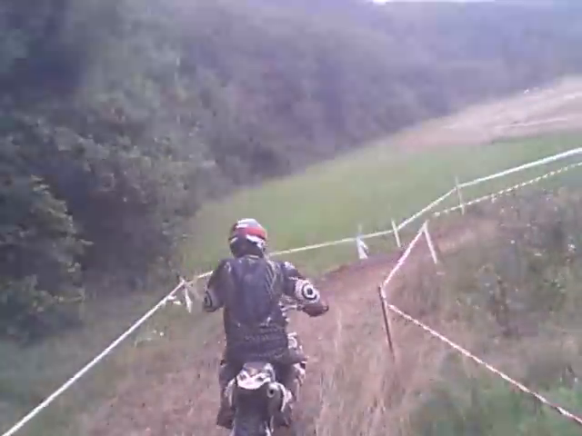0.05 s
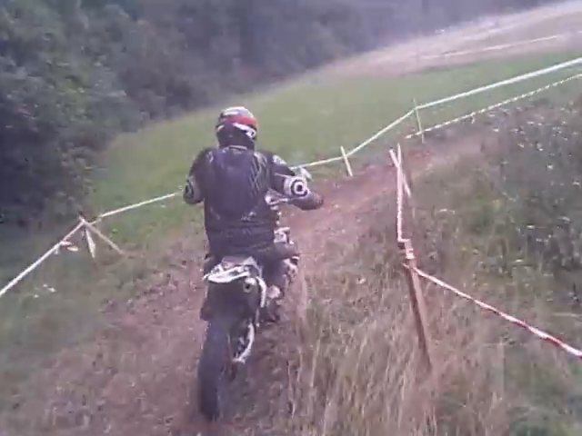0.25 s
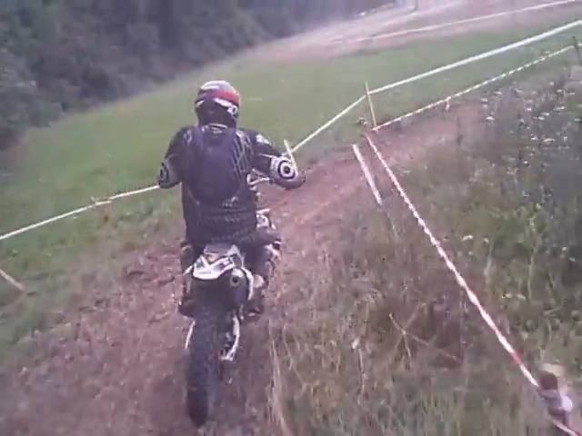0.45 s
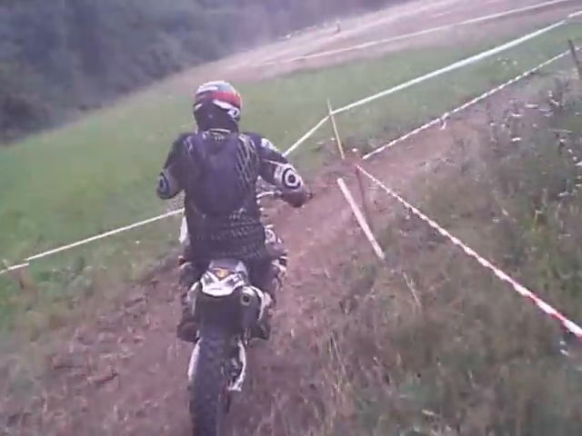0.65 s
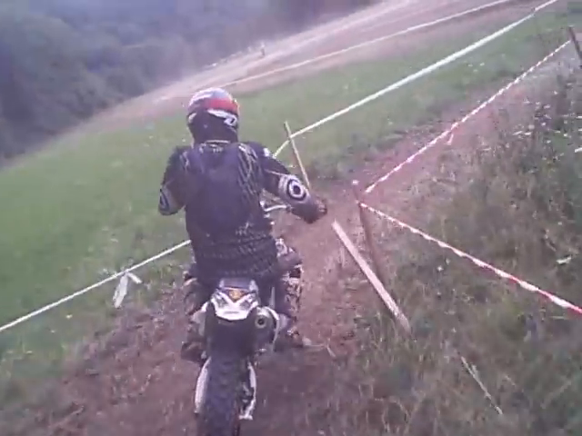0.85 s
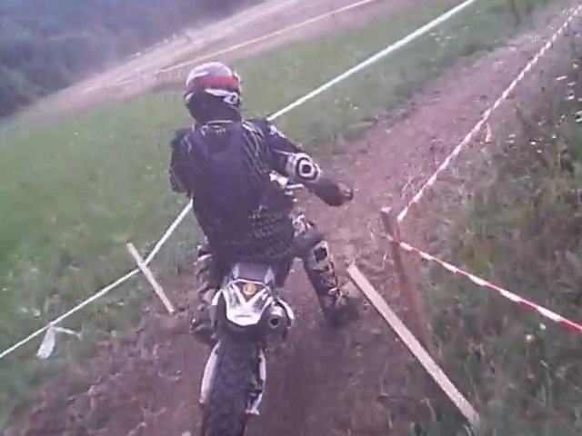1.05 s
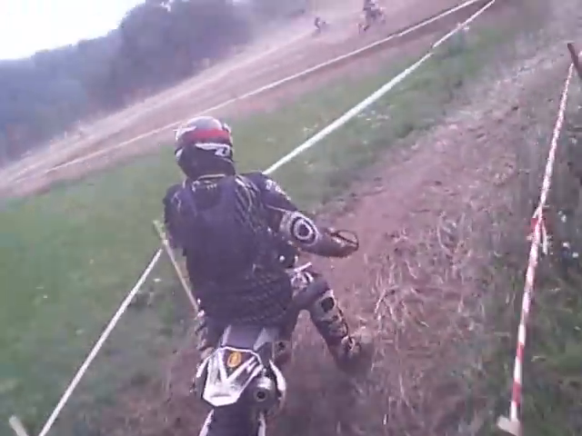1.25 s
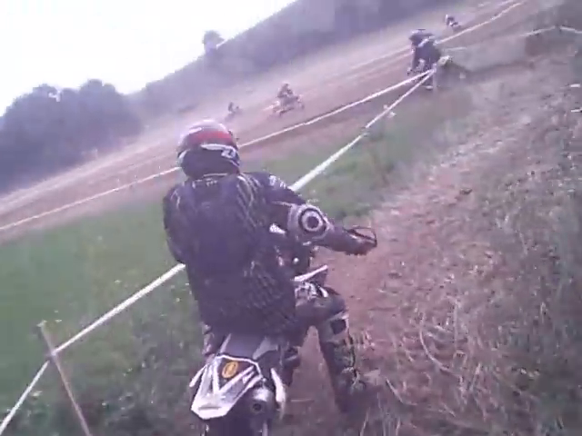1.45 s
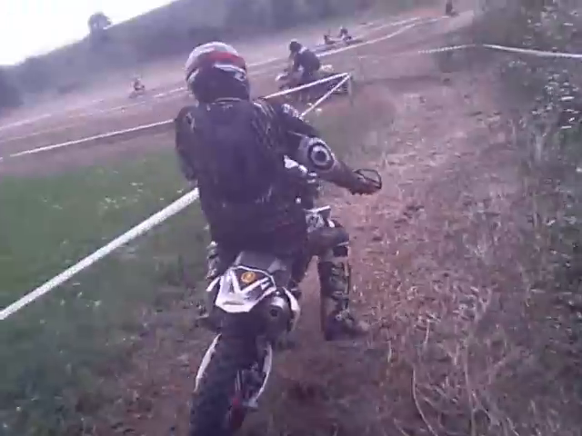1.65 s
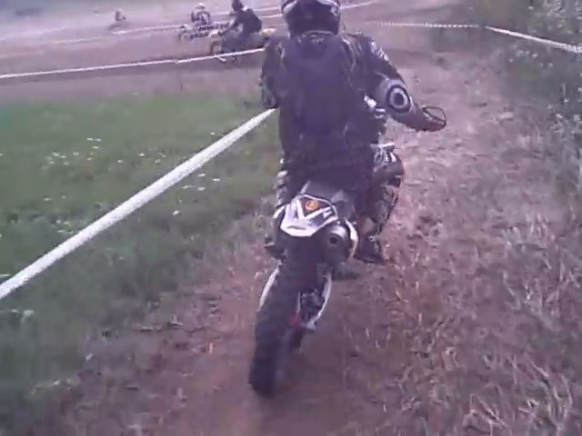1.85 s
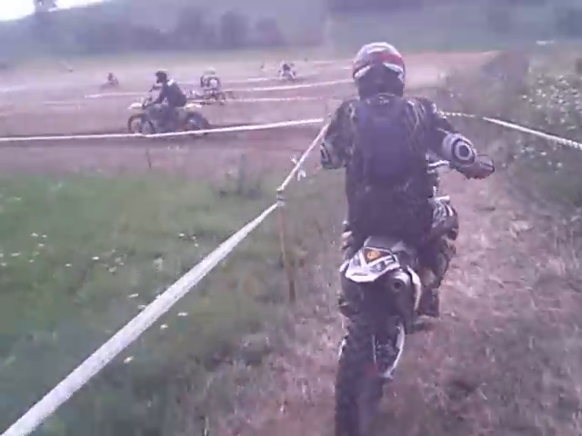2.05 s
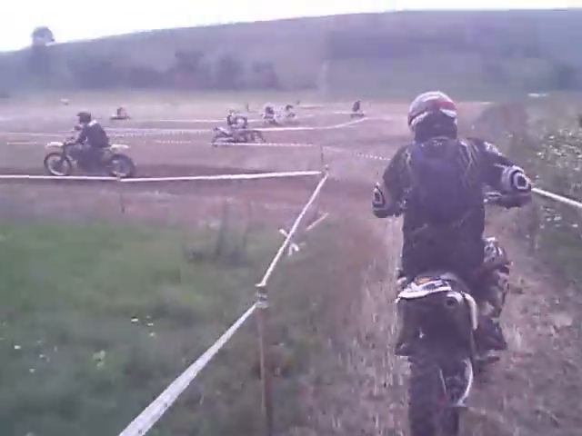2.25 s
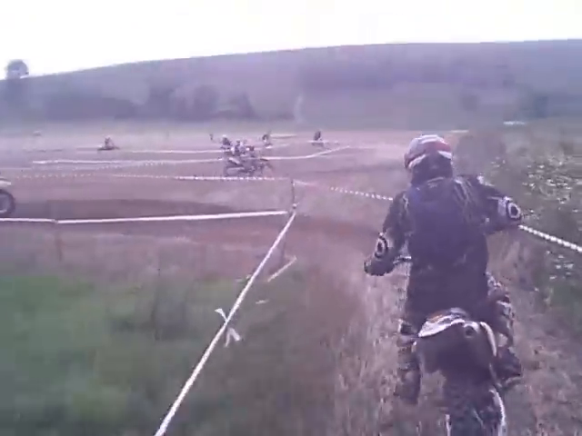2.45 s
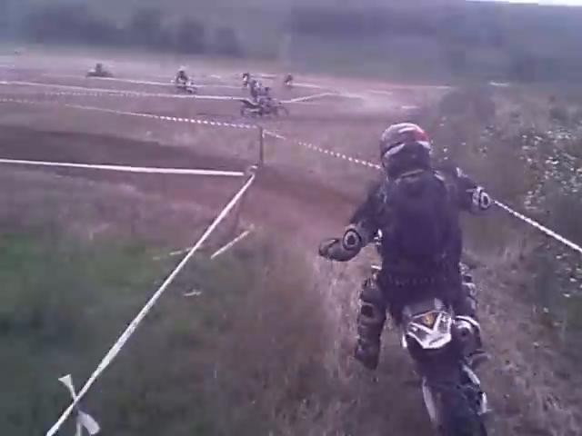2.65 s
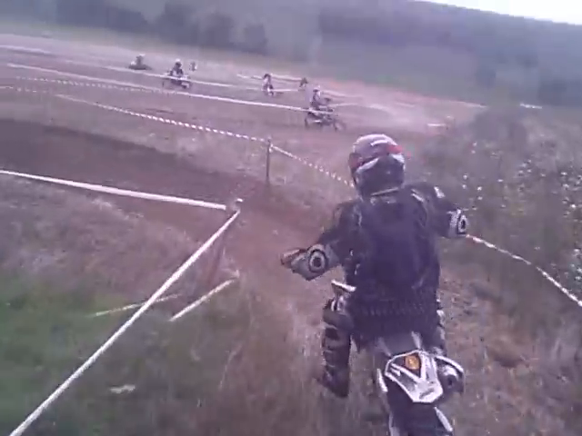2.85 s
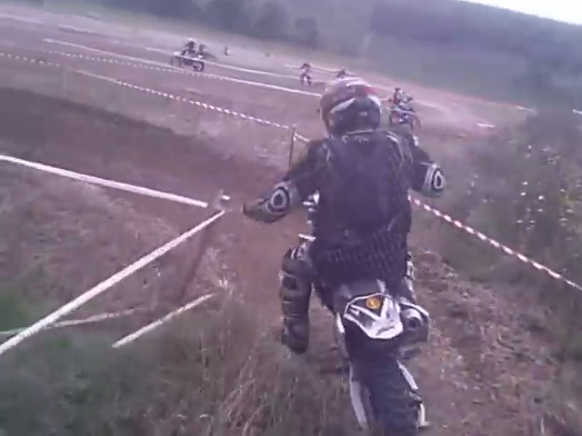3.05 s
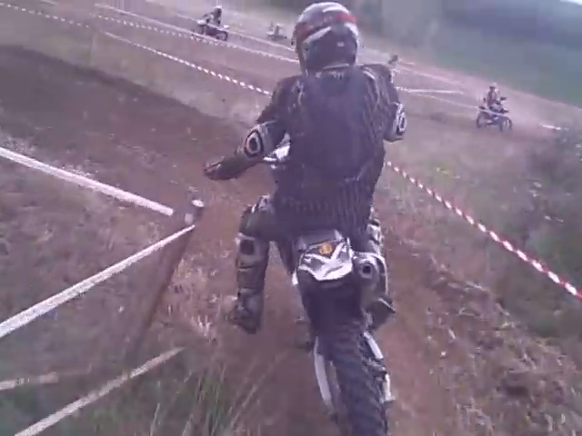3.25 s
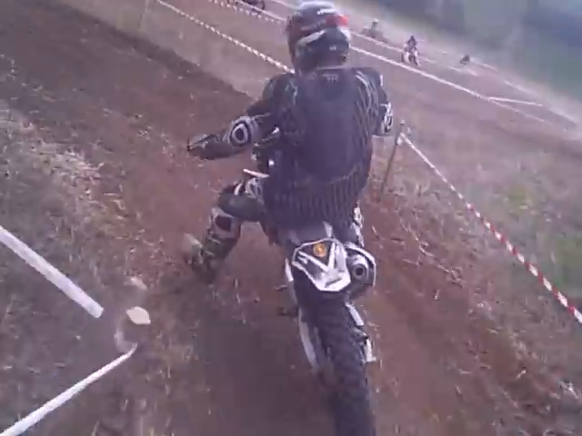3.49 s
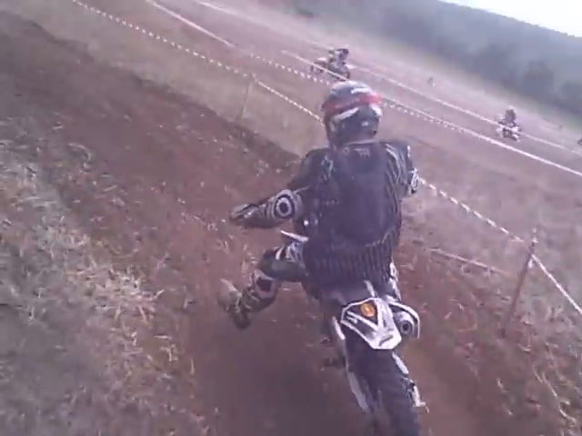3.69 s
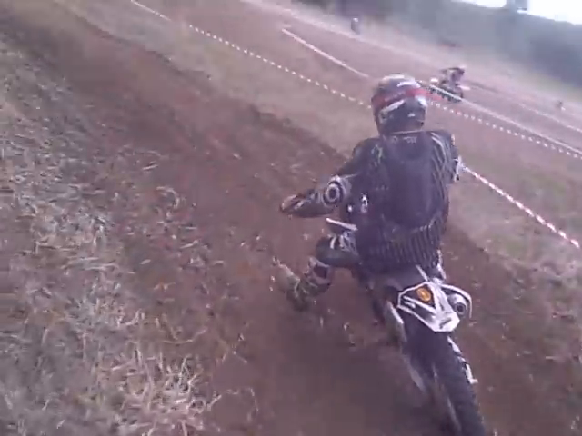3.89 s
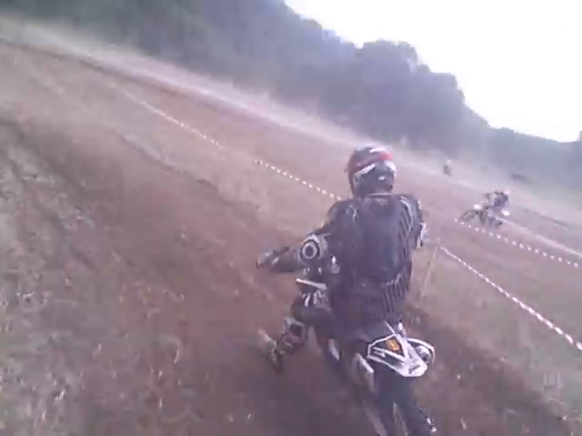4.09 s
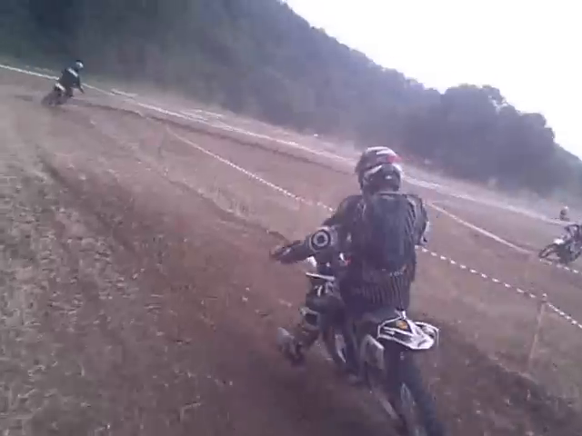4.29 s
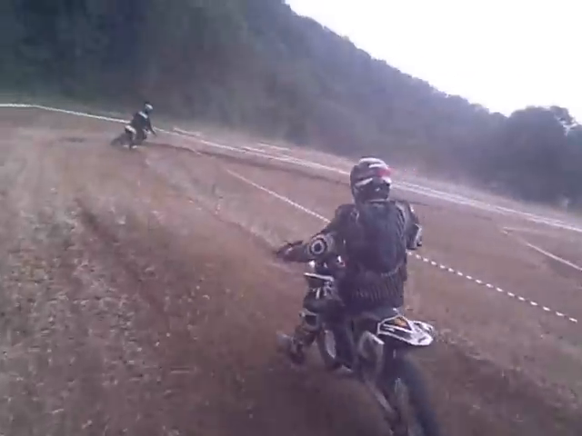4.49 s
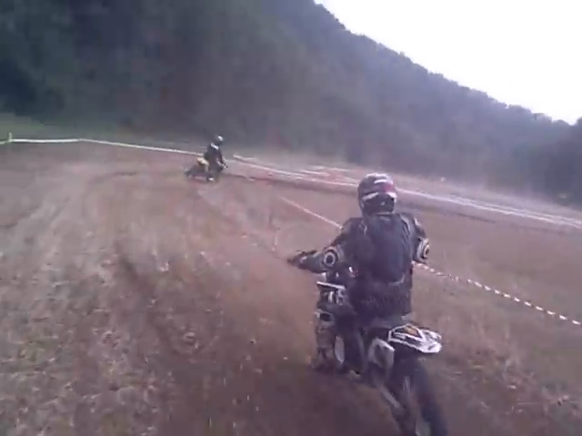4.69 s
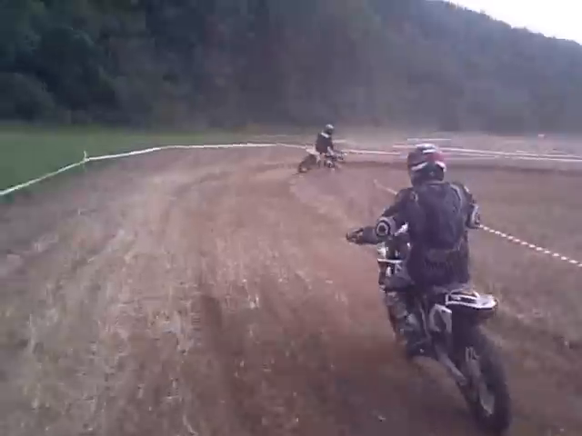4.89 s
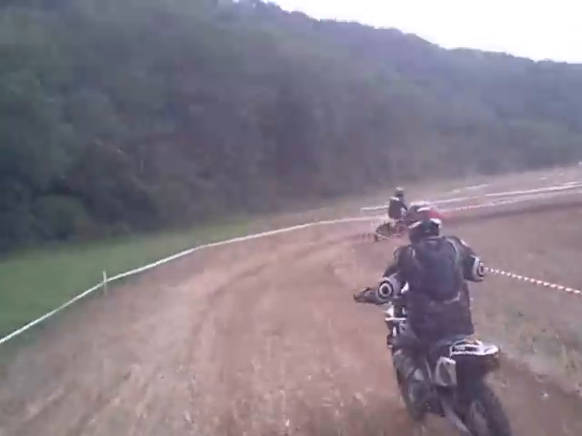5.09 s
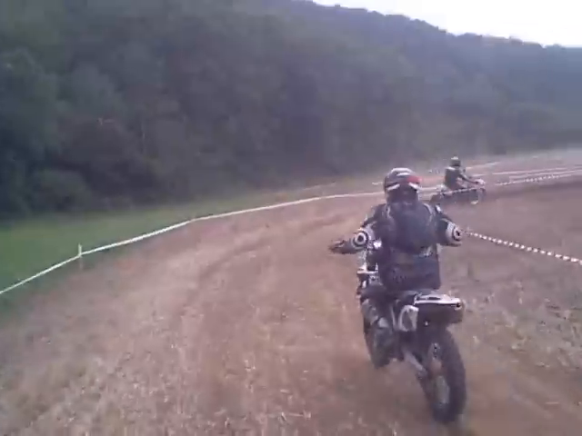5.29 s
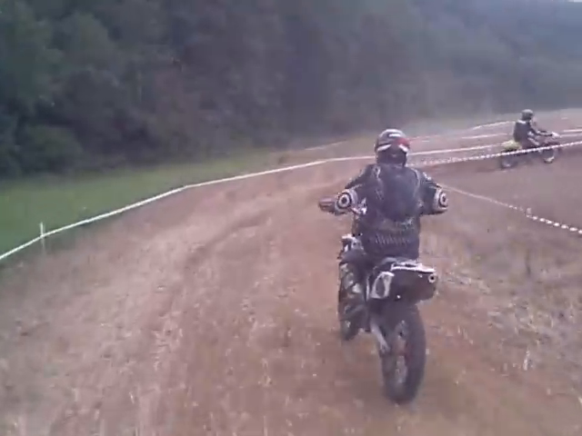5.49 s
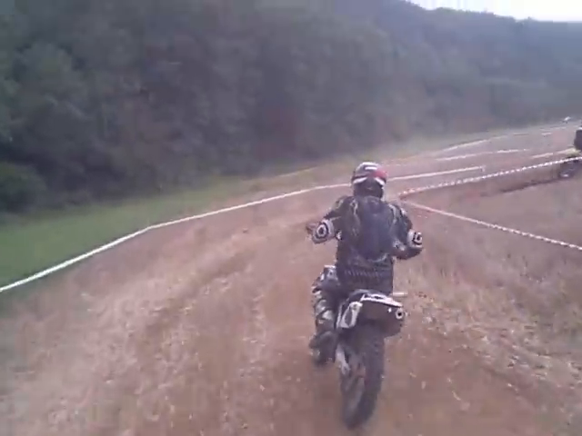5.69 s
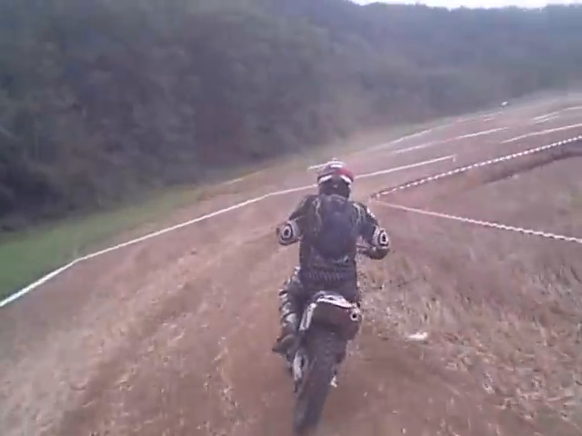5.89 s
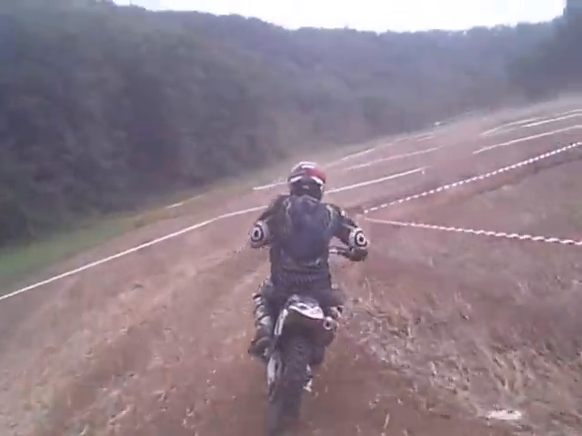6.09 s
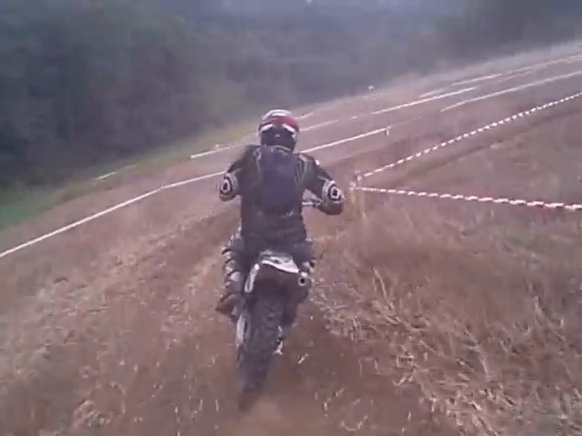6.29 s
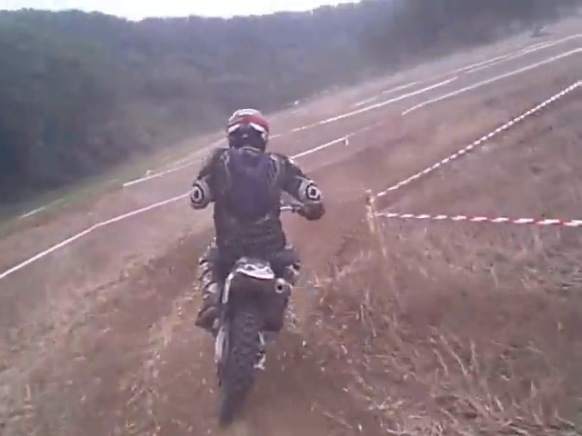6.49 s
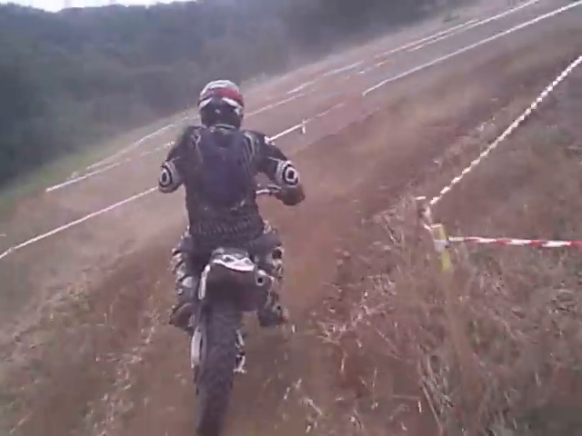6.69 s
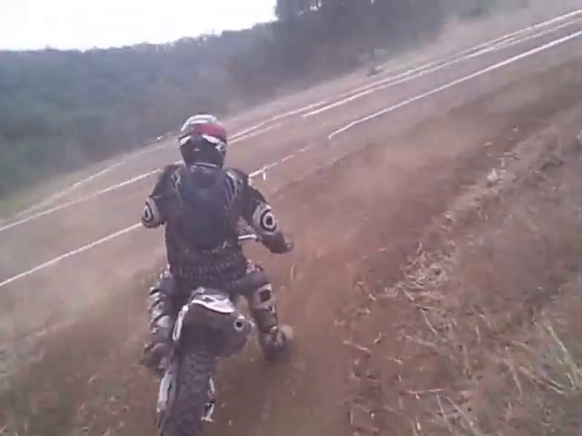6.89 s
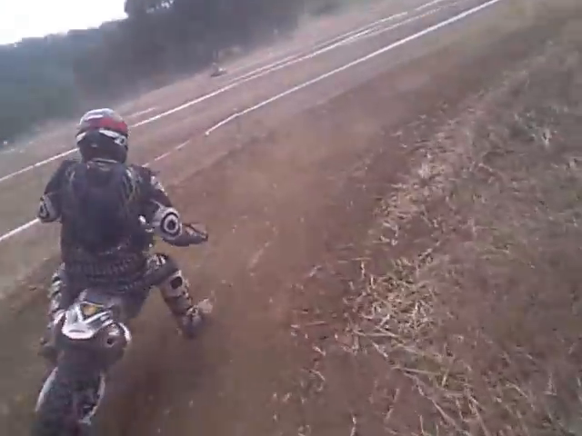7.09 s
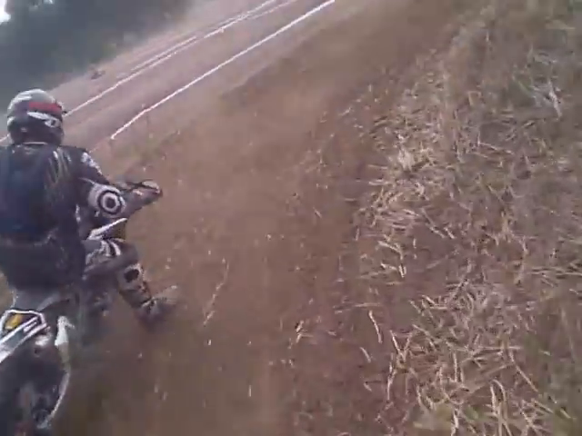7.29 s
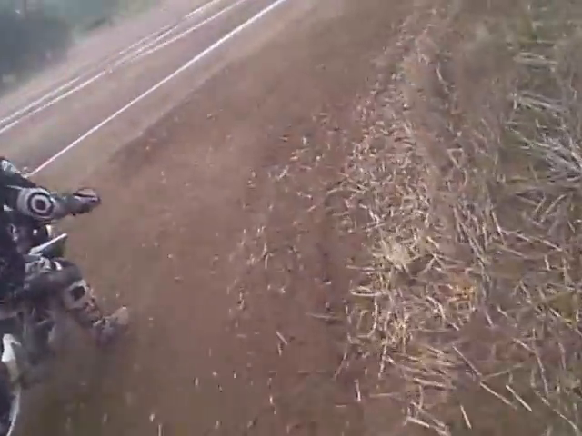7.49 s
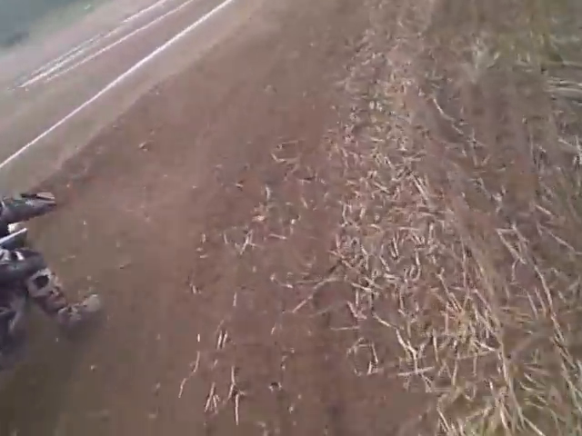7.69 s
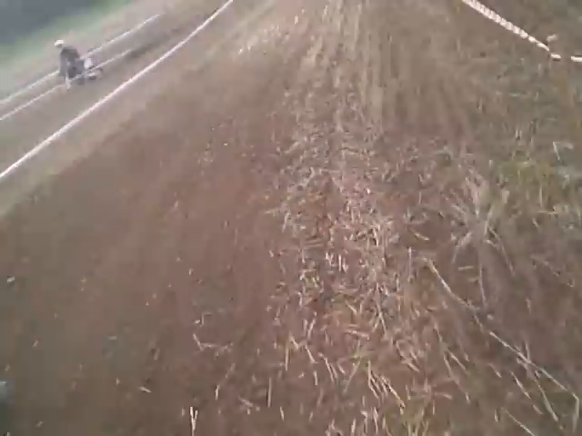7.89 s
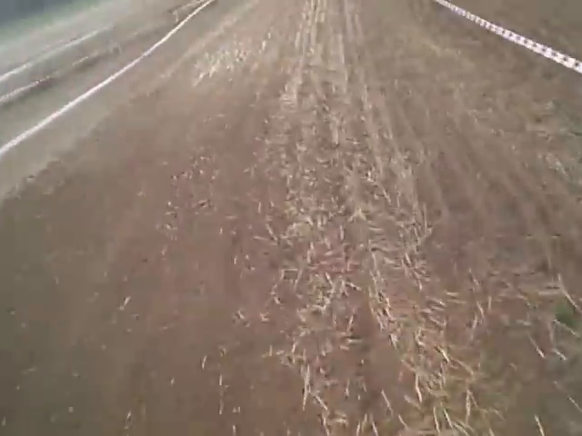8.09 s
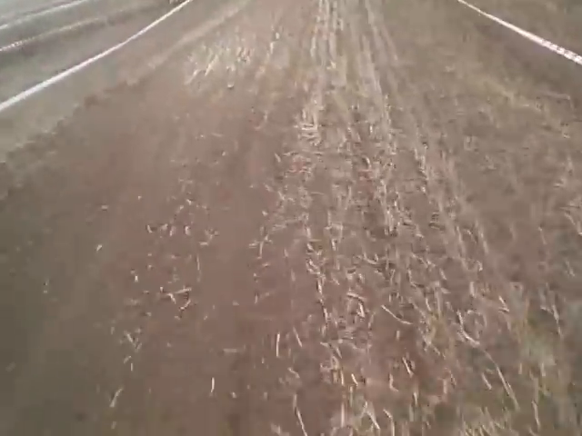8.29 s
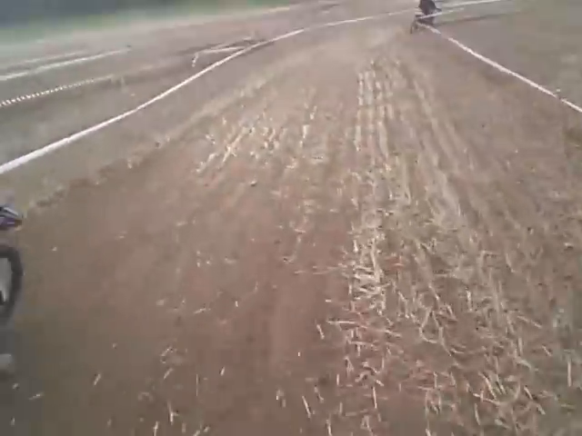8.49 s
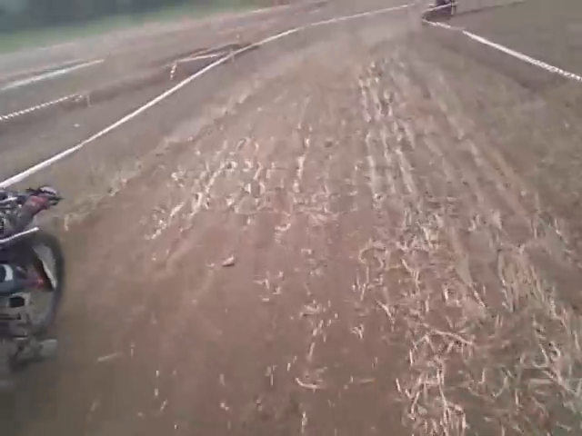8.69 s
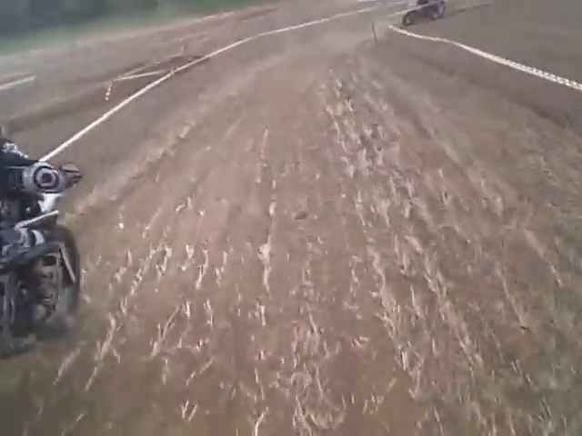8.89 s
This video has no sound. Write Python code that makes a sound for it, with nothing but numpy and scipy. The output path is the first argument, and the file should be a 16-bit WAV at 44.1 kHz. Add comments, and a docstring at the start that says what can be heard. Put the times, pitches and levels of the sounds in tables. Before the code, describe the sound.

Two dirt bikes ride close together on a dirt track, heard from a helmet microphone. The leading four-stroke barks in repeated throttle pulls while the nearer bike hums, clatters and hisses, with air rumbling underneath. The engines rev up loudly about halfway through, then ease off as a third bike buzzes briefly further away. Both surge again near the end, climbing to their highest pitch.

```python
"""On a dirt track, a helmet camera rides close behind a four-stroke dirt bike and draws level at the end. The
leader's exhaust barks once a firing. The camera's own bike hums through the rider's body near 300 Hz, clatters
and hisses as the throttle opens and closes, and its overtones swell into a drone. A third bike buzzes briefly,
tyres scrub and air buffets the helmet. The camera housing muffles the bass and rings near 1.5, 3.6 and 7.5 kHz."""
import sys
import numpy as np
from scipy import signal
from scipy.fft import rfft, irfft
from scipy.io import wavfile
from scipy.ndimage import uniform_filter1d

SR = 44100
rng = np.random.default_rng(int(sys.argv[2]) if len(sys.argv) > 2 else 0)


def file_out(sig):
    """Save sig as 16-bit WAV at sys.argv[1]."""
    # one column per channel
    cols = np.atleast_2d(sig).T
    # limit, then scale
    lim = np.clip(cols, -1, 1)
    pcm = np.round(lim * 32767).astype(np.int16)
    wavfile.write(sys.argv[1], SR, pcm)


N = 394630
T = np.arange(N) / SR

# tone of each sound through the camera housing: (frequency [Hz], relative level [dB])
AIR_TONE = [(4, 21), (12, 8.5), (22, 1.5), (38, -10), (56, -1.5), (75, -10), (120, -28), (250, -26),
            (600, -31.5), (2000, -52)]
JOLT_TONE = [(30, -4), (60, 4), (130, -10), (300, -15), (800, -29), (2000, -41)]
TYRE_TONE = [(300, -32), (650, -7), (850, -4), (1100, -4), (1450, 5.5), (1900, -6), (2800, -15),
             (6000, -37)]
HUM_TONE = [(30, 7), (55, -13), (90, -10.5), (150, -3), (205, -10.5), (235, -22), (268, 1.5), (303, 11.5),
            (335, 0), (380, -27), (470, -8), (550, -7), (700, -13), (950, -5), (1500, -25.5)]
CLATTER_TONE = [(150, -10), (550, -22.5), (900, -14), (1100, -13.5), (1330, -4), (1490, 2.5), (1720, -5.5),
                (2000, -8), (2450, -15), (3080, -18), (3500, -11), (4500, -18), (9000, -26)]
HISS_TONE = [(100, -31.5), (400, -21.5), (800, -24), (1500, -15), (2400, -18), (3100, -21), (3600, -17),
             (4800, -19), (6200, -7.5), (7000, 0.5), (7800, 1), (8500, -5.5), (9500, -15), (10800, -32.5)]
REAR_BARK_TONE = [(200, -31), (700, -25), (1100, -34.5), (1310, -11.5), (1450, 2), (1580, 3), (1780, -15),
                  (2050, -17.5), (2450, -26), (3050, -31), (3550, -11), (4600, -45), (9000, -59)]
SIDE_BARK_TONE = [(200, -20.5), (700, -19), (1100, -21), (1360, -4), (1500, -4.5), (1730, 5), (1900, -5),
                  (2180, -8), (2470, -4.5), (2800, -32), (3700, -35), (4800, -20), (10000, -48)]
CRACK_TONE = [(400, -26), (1500, -29), (2400, -14.5), (3000, -20.5), (3650, -12.5), (4800, -21.5),
              (6000, -10.5), (7000, -5), (7700, -0.5), (8500, -8.5), (9500, -19.5), (10800, -34.5)]
RASP_TONE = [(300, -38), (900, -15), (1450, 7.5), (1950, -1), (2550, -1.5), (3050, -11), (3450, 0),
             (4200, -13), (5200, -7.5), (8800, -12), (10500, -28)]
# short swells of noise: (time [s], level [dB], half-width [s])
FRAME_JOLTS = [(1.76, -58, 0.027), (2.39, -57, 0.022), (3.455, -54.5, 0.019), (8.24, -60, 0.0066)]
MOUNT_BUMPS = [(.625, -55, 0.022), (6.185, -41.5, 0.0085), (6.475, -46.5, 0.013)]
TYRE_SCRUBS = [(.06, -62.5, 0.25), (.475, -58, 0.041), (.66, -60, 0.044), (1.223, -60, 0.0035),
               (8.24, -45, 0.011)]
ROUGH_PATCHES = [(2.39, -51.5, 0.045), (2.86, -55.5, 0.034), (5.29, -48, 0.033), (5.76, -55, 0.084)]
# own engine's drone: (time [s], half-width [s], pitch [Hz], lowest note [dB], overtones [dB])
DRONE_SWELLS = [(0.697, .5, 162, -76.5, -80), (2.3, .17, 198.8, -66.5, -79), (4.75, .17, 156, -76, -62.5),
                (5.403, .12, 187.2, -85, -73), (6.65, .2, 160.2, -75.5, -76)]
# the drone's overtones: (multiple of its pitch, relative level [dB])
DRONE_OVERTONES = [(2, 8), (3, 2.5), (4, 1), (5, -15), (6, -4.5)]
# air and sway on the helmet: (time [s], level [dB])
AIR_LEVELS = [(0, -51), (.7, -52), (1.7, -47.5), (2.6, -47.5), (4.5, -50.5), (5.7, -60), (6.5, -52),
              (7.9, -58), (8.95, -55)]
# third bike's throttle blips: (opens [s], shuts [s], level [dB], swell [dB], firing rate [Hz])
THIRD_BLIPS = [(5.899, 5.97, -51, 3, 101.3), (6.04, 6.152, -52.5, 1, 97.1), (6.26, 6.302, -54, 2.5, 102.6),
               (6.42, 6.48, -51.5, 6, 116.2), (6.56, 6.756, -55, -1.5, 108.8)]
# engine speeds: (time [s], firing rate [Hz])
OWN_RATES = [(0, 53.15), (1.6, 54), (1.9, 60.7), (2.3, 67.4), (2.5, 68.3), (2.8, 52.15), (3.1, 42.8),
             (3.5, 43.06), (4.1, 47.52), (4.42, 58.1), (4.6, 65.9), (4.75, 66.2), (5.0, 71.1), (5.3, 70),
             (5.5, 75.5), (5.62, 74.5), (5.76, 62.6), (6.7, 40.95), (6.95, 41.98), (7.15, 50.83),
             (7.35, 51.87), (7.8, 61.4), (8.3, 75.9), (8.9, 80)]
LEADER_RATES = [(0.0, 47.12), (1.64, 40.93), (1.82, 44.55), (2.44, 49.43), (2.97, 32.27), (3.39, 43.09),
                (3.53, 42.6), (3.81, 48.27), (4.05, 46.79), (4.53, 62.1), (4.64, 60.79), (5.26, 74.9),
                (6.91, 38.43), (7.03, 50.38), (7.55, 51.38), (7.94, 64.53), (8.27, 84.71), (8.36, 83.7),
                (8.71, 94.44), (8.94, 84.45)]
# own bike's throttle: (time [s], opening [0-1])
OWN_THROTTLE = [(0, 0), (1.15, 0.09), (1.5, 0.55), (2.0, 0.54), (2.42, 0.51), (2.6, 0.34), (3.05, 0.36),
                (3.4, 0.56), (3.98, 0.49), (4.3, 0.95), (5.58, 0.98), (5.7, 0.41), (6.5, .25), (6.95, 0),
                (7.5, 1), (7.66, 0.64), (7.76, 0.99), (8.85, 1), (8.95, 0.66)]
# the hiss surges with the throttle held open: (opens [s], shuts [s], level [dB], swell [dB])
HISS_SURGES = [(1.72, 2.04, -49.5, 4), (2.87, 2.93, -58, -5), (4.62, 4.66, -30.5, 1),
               (4.7, 5.59, -37.5, 1.5), (7.39, 7.57, -36, 3.5), (7.74, 7.97, -35, 2.5),
               (8.04, 8.86, -40, 0)]
# the hum grows as the engine pulls hard: (start [s], end [s], boost [dB])
HUM_STRAINS = [(1.88, 2.46, 8), (4.198, 4.27, 11), (4.469, 4.558, 10.5), (5.439, 5.632, 9), (7.5, 7.573, 6),
               (8.3, 8.846, 2.5)]
# leader's pulls on the throttle:
# (opens [s], shuts [s], bark [dB], swell [dB], crack over bark at crack_ref_hz [dB], boom [dB])
LEADER_PULLS = [(1.369, 1.497, -55, -2, 1.5, -67.5), (1.574, 2.085, -50, 2.5, -0.5, -66),
                (3.125, 3.331, -52, 4, -0.5, -75), (3.405, 3.974, -54, 4, -5, -69.5),
                (4.08, 4.151, -50.5, 0, -6, -72), (4.245, 4.686, -43.5, 2.5, -7, -72),
                (4.78, 5.354, -46, 0, -8, -78), (7.141, 7.518, -51.5, 7, -0.5, -72),
                (7.769, 7.86, -40, -4, -0.5, -73), (7.92, 8.217, -41.5, 0.5, -1, -77),
                (8.25, 8.808, -41.8, 3, 2, -72.5)]
# leader's firings that pop harder: (time [s], boost [dB])
LEADER_POPS = [(1.754, 2), (2.086, 1.5), (3.152, 4), (3.204, 4.5), (3.678, 6), (4.059, 10.5), (4.2, 9),
               (4.276, 3), (4.435, 5), (5.253, 6), (7.645, 8.5)]
# how much of the leader's silencer is heard from the side: (time [s], share [0-1])
SIDE_SHARE = [(7.98, 0.25), (8.04, 1), (8.3, 1), (8.8, 0.89)]


def gain(db):
    """Turn decibels into a number to multiply by."""
    return 10 ** (np.asarray(db) / 20)


def unit(x):
    """Scale a signal to an average power of 1."""
    return x / np.sqrt(np.mean(x ** 2))


def curves(table):
    """Join each column of a table with straight lines in time."""
    times, *columns = np.transpose(table)
    return [np.interp(T, times, column) for column in columns]


def wander(per_s):
    """Glide to a new random value per_s times a second; the spread is 1."""
    step = int(SR / per_s)
    stairs = np.repeat(rng.standard_normal(N // step + 1), step)
    return unit(uniform_filter1d(stairs, step)[:N])


def held_levels(table, rise_db_per_s, fall_db_per_s):
    """One dB curve a row: it rises, changes by the swell while open, then dies away."""
    return np.array([db + np.interp(T, [opens, shuts], [-swell / 2, swell / 2])
                     - rise_db_per_s * np.maximum(opens - T, 0)
                     - fall_db_per_s * np.maximum(T - shuts, 0)
                     for opens, shuts, db, swell, *_ in table])


def colour(x, tone, size=16384):
    """Filter a sound to the shape of a tone table, at power 1."""
    hz, db = np.transpose(tone)
    bins = np.maximum(np.arange(size // 2 + 1) * SR / size, 1)
    shape_db = np.interp(np.log(bins), np.log(hz), db)
    cepstrum = irfft(np.log(gain(shape_db)))
    # folding this in half makes the filter ring after a click, never before
    cepstrum[1:size // 2] *= 2
    cepstrum[size // 2 + 1:] = 0
    click_response = irfft(np.exp(rfft(cepstrum)))
    return unit(signal.fftconvolve(x, click_response)[:N])


def ring(x, hz, width_hz):
    """Make a sound ring at one pitch, at power 1."""
    return unit(signal.lfilter(*signal.iirpeak(hz, hz / width_hz, fs=SR), x))


def bursts(table, tone):
    """Short swells of grainy noise in one tone."""
    swell = sum(gain(db) * np.exp(-((T - time) / width) ** 2 / 2) for time, db, width in table)
    grains = rng.standard_normal(N) * gain(1.9 * wander(500))
    return swell * colour(grains, tone)


def firings(hz, jitter_s, scatter_db, pops=(), max_count=1200):
    """One click an engine cycle, each a little early or late, strong or weak."""
    chance = rng.standard_normal((max_count, 2))
    cycles = np.cumsum(hz) / SR
    times = np.interp(np.arange(1, int(cycles[-1]) + 1), cycles, T)
    delay_s, db = (chance[:len(times)] * [jitter_s, scatter_db]).T
    db = db * 60 / np.interp(times, T, hz)  # lumpier below 60 firings a second, steadier above
    for time, boost_db in pops:
        db[np.argmin(abs(times - time))] = boost_db
    at = np.clip(((times + delay_s) * SR).astype(int), 0, N - 1)
    clicks = np.zeros(N)
    clicks[at] = gain(db) / np.sqrt(hz[at])  # even power at any speed
    return unit(clicks)


def puffs(clicks, rise_s, decay_s):
    """A burst of swirling gas after each click."""
    envelope = clicks
    for seconds in (rise_s, decay_s):
        envelope = signal.lfilter([1], [1, -np.exp(-1 / (seconds * SR))], envelope)
    return unit(envelope * rng.standard_normal(N))


def engine_drone(climb_hz_per_s=16):
    """Engine overtones swell: a rough, wavering note from the camera's own bike comes and goes."""
    time, width, pitch, low_db, high_db = np.transpose(DRONE_SWELLS)
    swells = np.exp(-((T - time[:, None]) / width[:, None]) ** 2 / 2)
    active = swells.argmax(axis=0)
    hz = pitch[active] + climb_hz_per_s * (T - time[active])
    phase = 2 * np.pi * np.cumsum(hz * (1 + .011 * wander(40))) / SR
    overtones = sum(gain(db + 2.8 * wander(9)) * np.sin(k * phase) for k, db in DRONE_OVERTONES)
    flutter = unit(gain(2.5 * wander(35)))
    low = gain(low_db) @ swells * unit(np.sin(phase))
    high = gain(high_db) @ swells * unit(overtones)
    return flutter * (low + high)


def helmet():
    """Air buffets the helmet, jolts thud through the frame, and bumps rattle the camera mount."""
    air_db = curves(AIR_LEVELS)[0] + .6 * wander(4.02)  # small gusts
    air = gain(air_db) * colour(rng.standard_normal(N), AIR_TONE)
    return air + bursts(FRAME_JOLTS, JOLT_TONE) + bursts(MOUNT_BUMPS, HISS_TONE)


def tyres():
    """Tyres scrub briefly over dirt and grass."""
    return bursts(TYRE_SCRUBS, TYRE_TONE)


def third_bike():
    """Fast firings further along the track make a short, thin rasp."""
    hz, = curves([(opens, rate) for opens, *_, rate in THIRD_BLIPS])
    db = held_levels(THIRD_BLIPS, rise_db_per_s=90, fall_db_per_s=170).max(axis=0)
    clicks = firings(hz * (1 + .02 * wander(12)), jitter_s=.0001, scatter_db=2)
    blast = clicks + gain(.5) * puffs(clicks, rise_s=.0011, decay_s=.0053)
    return gain(db) * colour(blast, RASP_TONE)


def own_bike(strain_fade_s=.077, waver_db=.72):
    """Firings hum through the rider's body, engine and chain clatter, and hiss follows the throttle."""
    hz, = curves(OWN_RATES)
    throttle, = curves(OWN_THROTTLE)
    strain_db = sum(np.interp(T, [start - strain_fade_s, start, end, end + strain_fade_s], [0, db, db, 0])
                    for start, end, db in HUM_STRAINS)
    clicks = firings(hz, jitter_s=.00005, scatter_db=2.5)
    hum = gain(-77.5 + 13 * throttle + strain_db) * colour(clicks, HUM_TONE)
    # many small knocks make clatter and hiss grainy; rough ground makes them waver
    knocks = rng.standard_normal(N) * gain(1.74 * wander(260))
    grit = rng.standard_normal(N) * gain(1.4 * wander(700) + .59 * wander(35))
    clatter_db = -61 + 12.5 * throttle + waver_db * wander(7)
    clatter = gain(clatter_db) * colour(knocks, CLATTER_TONE) + bursts(ROUGH_PATCHES, CLATTER_TONE)
    hiss_db = -58.5 + 16.5 * throttle + waver_db * wander(7)
    surge_db = held_levels(HISS_SURGES, rise_db_per_s=215, fall_db_per_s=356).max(axis=0)
    hiss = np.hypot(gain(hiss_db), gain(surge_db)) * colour(grit, HISS_TONE)
    return hum + clatter + hiss


def silencer(blast):
    """The leader's silencer rings briefly after each blast, at a higher note from the side."""
    side, = curves(SIDE_SHARE)
    behind = unit(colour(blast, REAR_BARK_TONE) + gain(-2) * ring(blast, hz=1466, width_hz=95))
    beside = unit(colour(blast, SIDE_BARK_TONE) + gain(-6.5) * ring(blast, hz=1637, width_hz=130))
    return np.sqrt(1 - side) * behind + np.sqrt(side) * beside


def leader(coast_db=-72.5, crack_ref_hz=55.6, boom_hz=195, boom_width_hz=111):
    """Each firing sends a blast of gas through the silencer; under load it sharpens into a crack."""
    hz, = curves(LEADER_RATES)
    pulls_db = held_levels(LEADER_PULLS, rise_db_per_s=145, fall_db_per_s=210)
    _, _, middle_db, _, sharp_db, low_db = np.transpose(LEADER_PULLS)[:, :, None]
    bark_db = np.maximum(pulls_db.max(axis=0), coast_db)
    crack_db = np.maximum((pulls_db + sharp_db).max(axis=0), coast_db)
    crack_db += 6 * np.log2(hz / crack_ref_hz)  # 6 dB louder each time the revs double
    # the pipe's low boom grows less with load than the bark does
    boom_db = (low_db + .5 * (pulls_db - middle_db)).max(axis=0)
    clicks = firings(hz, jitter_s=.00003, scatter_db=1.9, pops=LEADER_POPS)
    bark = silencer(clicks + gain(-6) * puffs(clicks, rise_s=.0006, decay_s=.003))
    crack = colour(puffs(clicks, rise_s=.00034, decay_s=.0016) + gain(-20) * clicks, CRACK_TONE)
    boom = ring(ring(clicks, boom_hz, boom_width_hz), boom_hz, boom_width_hz)
    return gain(bark_db) * bark + gain(crack_db) * crack + gain(boom_db) * boom


def scene():
    """All the bikes, the tyres and the helmet at one microphone."""
    return (leader() + own_bike() + third_bike() + engine_drone() + tyres() + helmet())[None]


def record(dry):
    """The small camera cuts the highest treble steeply, and its signal sits slightly off zero."""
    top_hz, offset = 10900, -.004
    treble_cut = signal.ellip(10, .2, 80, top_hz, fs=SR, output="sos")
    return signal.sosfilt(treble_cut, dry) + offset


dry = scene()
out = record(dry)
file_out(out)
```